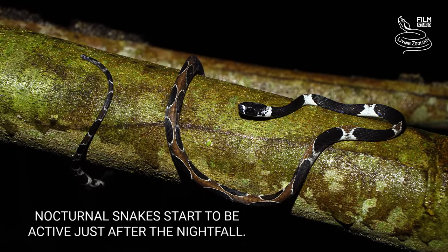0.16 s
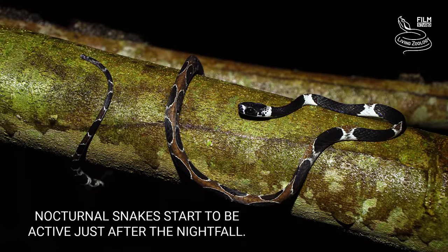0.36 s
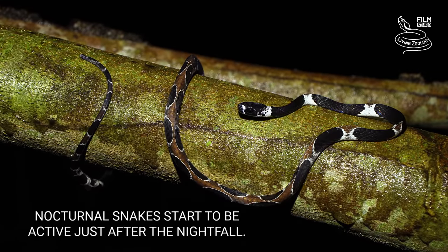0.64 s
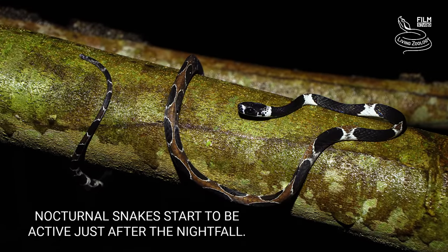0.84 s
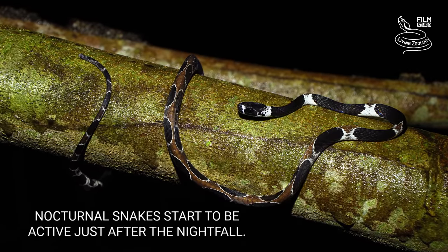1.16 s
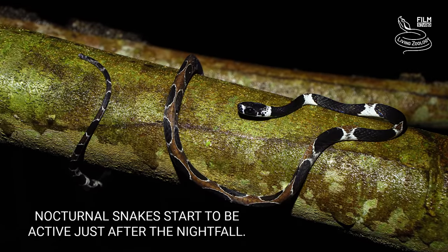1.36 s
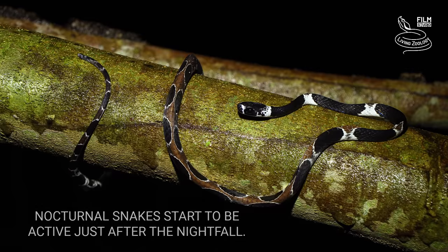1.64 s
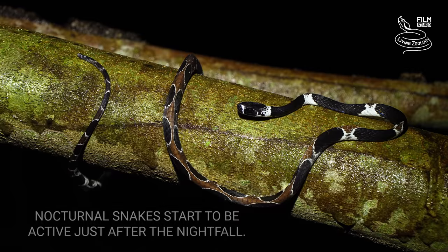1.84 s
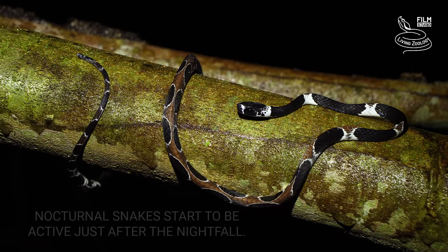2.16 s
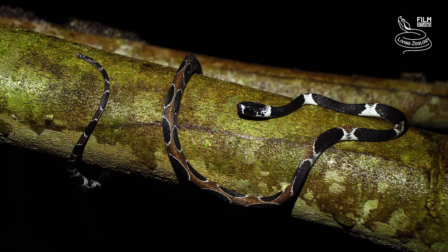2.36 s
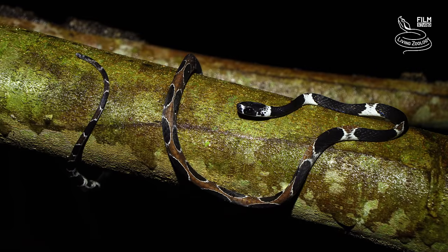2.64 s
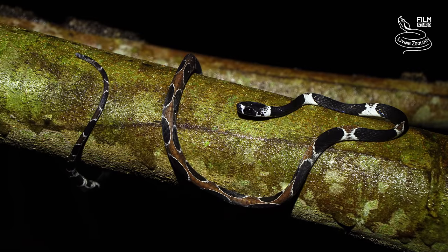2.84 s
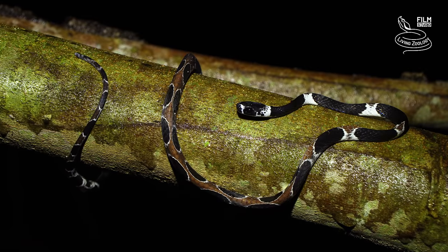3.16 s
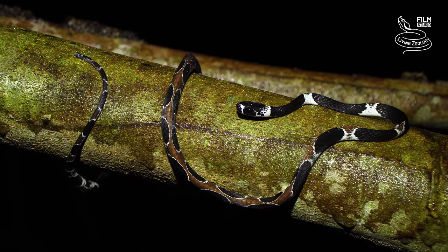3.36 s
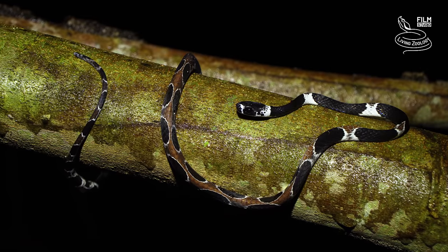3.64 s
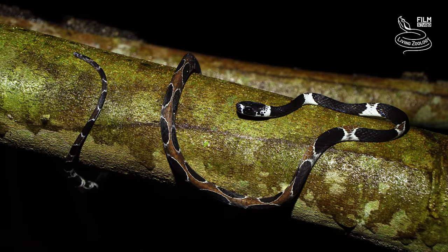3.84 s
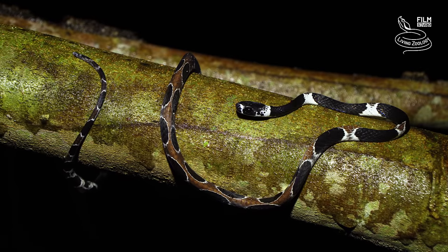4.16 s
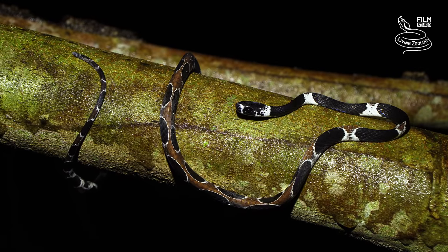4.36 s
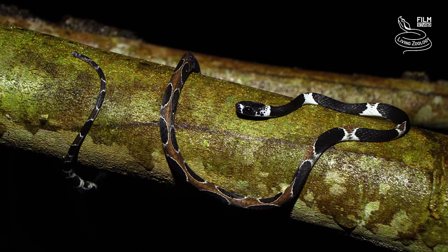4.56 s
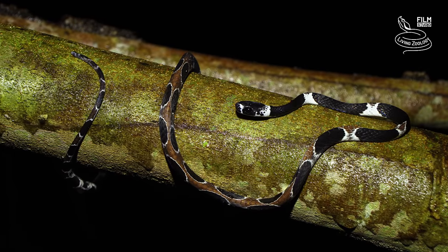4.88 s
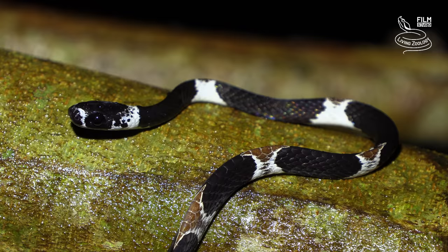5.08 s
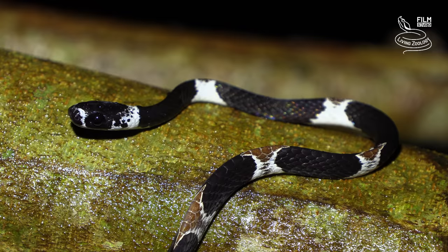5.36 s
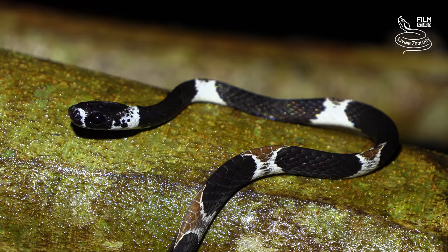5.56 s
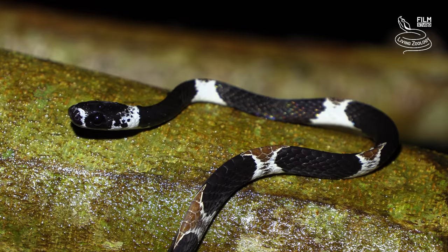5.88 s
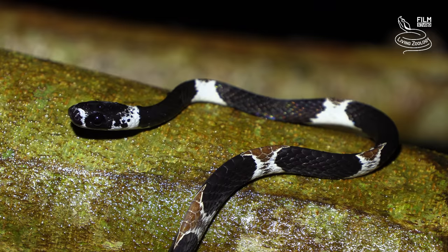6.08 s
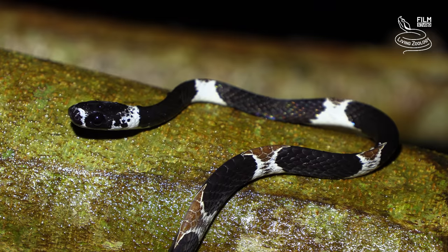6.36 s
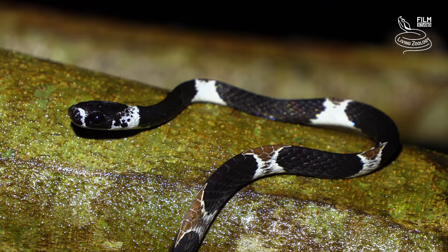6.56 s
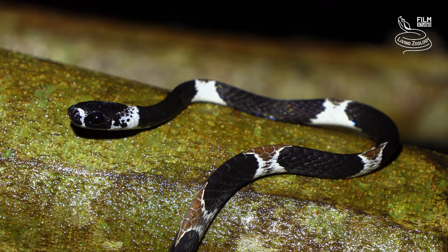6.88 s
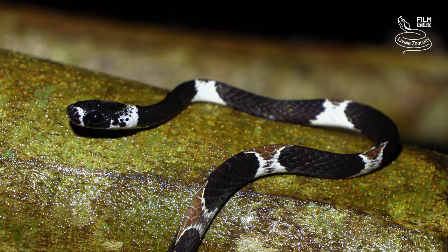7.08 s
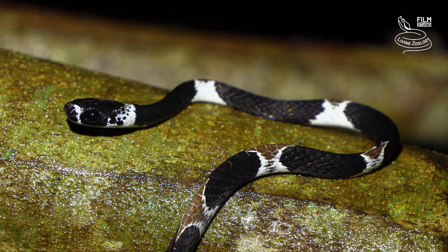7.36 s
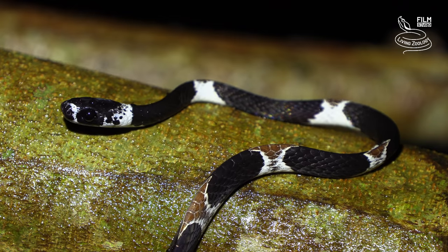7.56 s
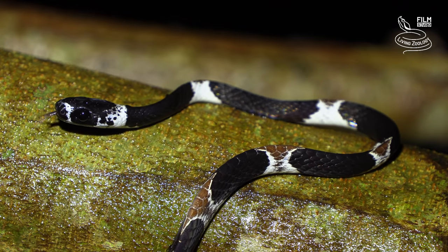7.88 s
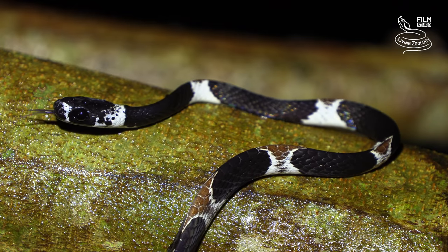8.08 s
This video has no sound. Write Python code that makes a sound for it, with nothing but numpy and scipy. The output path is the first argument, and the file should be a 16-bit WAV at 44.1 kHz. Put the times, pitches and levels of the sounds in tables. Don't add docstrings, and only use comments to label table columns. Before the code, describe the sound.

A rainforest at night, heard by a still microphone, with every call blurred by trunks and leaves. Throughout, distant insects form a dense, high, shimmering trill around 6 to 8.5 kHz, gently swelling, over very faint air and low hum. From 0 s a loud near cricket makes bright double chirps near 6.8 kHz, about ten per second; they turn weaker from about 1.2 to 2.7 s, then strong until 7.6 s. A lower cricket near 4.5 kHz sings short phrases until 5.3 s. A soft two-note rising frog call repeats every 0.65 s until 5.5 s; another frog rattles briefly about every 1.4 s. Faint far chirps run from 3.6 to 6.5 s. Small peeps come near 2.3, 3, 4.2, 4.4, 6.6 and 6.8 s. Sparse drips tap leaves, clearest near 1.6, 3.9, 4.8 and 6.1 s. From 6.8 s high katydid bursts repeat five times a second; from 7.6 s a low, raspy frog ticks rapidly to the end.

```python
import sys
import numpy as np
from scipy import signal
from scipy.io import wavfile
from scipy.ndimage import uniform_filter1d

SR = 44100
rng = np.random.default_rng(int(sys.argv[2]) if len(sys.argv) > 2 else 0)


def volts_from_db(level):
    exponent = np.asarray(level, float) / 20
    return 10 ** exponent


def inscribe(sig):
    pcm = np.round(np.clip(np.atleast_2d(sig).T, -1, 1) * 32767)
    wavfile.write(sys.argv[1], SR, pcm.astype(np.int16))


N = 362502
LEAD = 1
T = np.arange(N + LEAD * SR) / SR - LEAD

# pitch_hz, level_db (per Hz)
AIR = [(44, -35), (62, -7), (80, -1), (156, -7.5), (316, -9), (400, -11), (1140, -19), (1710, -19),
       (2470, -21.5), (3790, -18), (4400, -12.5), (5200, -24.5), (6500, -30)]
AIR_DB = -60.5
# pitch_hz, level_db (per Hz)
HAZE = [(4900, -28), (5200, -17.5), (5990, -6), (6300, 0), (6700, 1.5), (7000, -7.5), (7550, -7.5),
        (8000, -2), (8440, -4.5), (8650, -23), (8900, -14), (9400, -16), (10600, -35.5), (15600, -41.5)]
HAZE_DB = -43
# pitch_hz, level_db, wander_hz
HUM = [(51, -74, 0.11), (79.3, -69.5, 3), (89.2, -75, 3.12)]
# pitch_hz, level_db
BUZZ = [(5340, -74.5), (5416, -74), (5496, -73.5), (5580, -73.5), (5658, -74), (5733, -72)]
# middle_s, level_db, half_length_s
RUSTLE_SWELLS = [
    (.56, -66, .05),
    (1.04, -64, .1),
    (1.75, -70, .4),
    (4.55, -68, .12),
    (4.96, -60.5, 0.083),
    (6.2, -60, 0.11),
    (7.71, -63, .07),
]

# start_hz, end_hz, length_s, bend
GLIDE = dict(loud=(6720, 6890, .026, .35), low=(4700, 4290, .038, 3.3), far=(4185, 4090, .028, .8),
         burst=(7820, 7650, .018, 1.5), first=(2860, 3230, .045, .5), second=(2820, 3340, .06, .45),
         rattle=(3850, 4320, .02, .7), tick=(2420, 2345, .02, .8), whine=(4960, 4900, .055, 1))
REST_DB = dict(mid=-50.5, top=-51.5, edge=-60, drone=-80, rustle=-73.5, twin=-64.5)
# start_s, first_stroke_db, second_stroke_db, stroke_gap_s
BOUT_EARLY = [
    (-.455, -32, -35, 0.043),
    (-.035, -29.5, -29.5, 0.039),
    (.385, -30.5, -28, .04),
    (.807, -30, -29.5, 0.042),
]
BOUT_LONG = [(1.237, -39, -46, .042), (1.66, -44, -48, 0.049), (2.066, -39, -48, 0.043),
             (2.479, -38, -32, 0.038), (2.866, -30, -39, 0.039), (3.246, -31, -31, 0.044),
             (3.64, -30, -31, 0.048), (4.052, -31, -30.5, 0.04), (4.445, -29.5, -29.5, .045),
             (4.863, -30.5, -28.5, 0.043), (5.28, -31, -28, .039), (5.686, -30, -28, .036),
             (6.097, -28, -30, .039), (6.508, -29, -26.5, 0.039), (6.923, -30, -30.5, 0.037),
             (7.346, -32.5, -28.5, 0.037), (7.755, -27, -42, 0.045)]
EARLY_STOP_S, LONG_STOP_S = .83, 7.62
AFTER_S, AFTER_DB = .035, -7.5
AFTER_LOSS_DB_PER_S, TIGHT_GAP_S = 700, .037
UNEVEN_DB = .8
SAG_HZ_PER_DB, FULL_DB = 9, -29
# first_pair_s, level_db, last_pair_s, pair_count
LOW_PHRASES = [
    (-.165, -46, .024, 3),
    (.346, -46, .642, 4),
    (.997, -45.5, 1.177, 3),
    (1.53, -45, 1.697, 3),
    (2.112, -45, 2.395, 4),
    (2.714, -44.5, 2.876, 3),
    (3.349, -45.5, 3.633, 4),
    (4.286, -45, 4.474, 3),
    (5.113, -45, 5.211, 2),
]
LOW_GAP_S, LOW_FIRST_DB = .041, -0.5

# pitch_hz, fall_hz, strokes_per_s, level_db
CHOIR_LOW = [(6285, 200, 42, -7), (6425, 150, 58, -2.5), (6510, 200, 51, -5), (6615, 150, 29, 0),
             (6715, 200, 61, 0), (5990, 200, 37, -13)]
CHOIR_MID = [(7255, 150, 33, -2), (7375, 120, 19.5, 1), (7715, 120, 41, 0), (7800, 200, 47, 0),
             (7070, 100, 53, -6)]
CHOIR_TOP = [(8270, 150, 31, 0), (8390, 150, 15.5, 2), (8420, 200, 49, 0), (8460, 250, 63, -4)]
# time_s, level_db
LOW_CHOIR_LEVEL = [
    (0.0, -41.5),
    (0.82, -41.5),
    (1.1, -44.5),
    (2.3, -44.5),
    (2.72, -45.5),
    (5.7, -45.5),
    (7.0, -45.5),
    (7.49, -44.5),
    (7.8, -56),
]
# middle_s, level_db, half_length_s
MID_SWELLS = [
    (.8, -49, .3),
    (4.3, -52, 0.29),
    (5.7, -46.5, 0.45),
    (7.0, -49, 0.23),
    (7.42, -45, .05),
    (7.6, -46, .05),
    (7.81, -46.5, 0.045),
    (8.01, -47, 0.046),
]
TOP_SWELLS = [
    (.7, -50.5, 0.23),
    (2.0, -49, 0.22),
    (2.75, -49.5, 0.29),
    (5.4, -55, 1),
    (7.0, -47.5, .25),
    (7.6, -49, 0.071),
    (8.01, -52, .06),
    (8.18, -50, .05),
]
# middle_s, level_db, half_length_s
EDGE_SWELLS = [
    (.38, -50, .12),
    (1.35, -54, 0.27),
    (2.6, -60, 0.54),
    (3.3, -46.5, .1),
    (4.35, -48, .25),
    (5.2, -53, .3),
    (5.9, -48.5, 0.15),
    (7.15, -57, .3),
]
# middle_s, level_db, half_length_s
TWIN_SWELLS = [
    (2.6, -66, .6),
    (3.75, -66, 0.22),
    (4.56, -63, 0.11),
    (5.5, -63, .3),
]
TWIN_STOP_S, TWIN_FADE_DB_PER_S = 5.5, -21

# start_s, level_db
RATTLES = [
    (-.045, -50.5),
    (1.437, -50.5),
    (2.746, -50.5),
    (4.095, -50.5),
    (5.456, -49.5),
    (6.91, -50),
]
# middle_s, level_db, half_length_s
DRONE_SWELLS = [
    (.8, -74, 0.76),
    (1.85, -77, 0.23),
    (3.05, -74, .15),
    (3.43, -70.5, 0.064),
    (4.05, -72, .2),
    (4.9, -71.5, 0.25),
    (6.0, -76, .25),
    (6.75, -72.5, 0.26),
    (7.44, -72, .05),
    (7.8, -73, 0.18),
]
# start_s, level_db
TWO_NOTES = [(0.072, -55), (0.2153, -53), (0.728, -54.5), (0.8632, -52), (1.3208, -56.5), (1.4702, -54.5),
             (2.027, -55.5), (2.1587, -51.5), (2.6893, -55.5), (2.835, -51), (3.2912, -53), (3.4593, -51),
             (3.9637, -56), (4.1062, -53), (4.6524, -57), (4.791, -52), (5.292, -57.5), (5.4308, -52.5)]
# start_s, level_db, lowest_hz, highest_hz, patter_length_s
DRIPS = [(0.254, -57, 1200, 4000, .01), (0.525, -60, 1170, 2600, 0.012), (1.588, -53, 200, 980, .025),
         (1.645, -60, 2970, 4000, .006), (3.851, -52, 550, 2620, 0.023), (4.847, -48, 1190, 4530, 0.023),
         (5.015, -61, 1980, 3600, .01), (5.177, -61, 650, 1200, .02), (6.082, -49.5, 250, 4000, 0.021),
         (6.32, -52, 1300, 10000, 0.0028), (7.431, -57, 1380, 2020, 0.016)]
SNAP, SNAP_S = 20, .005
# start_s, level_db, end_pitch_hz
PEEPS = [
    (0.639, -60, 3980),
    (2.33, -52, 4350),
    (2.97, -51.5, 4380),
    (4.19, -48, 4500),
    (4.409, -48, 4520),
    (6.589, -49.5, 4450),
    (6.821, -48, 4510),
]
# start_s, level_db, pitch_hz
DRIP_RINGS = [(1.588, -53, 540), (3.85, -57, 660), (3.852, -57, 940), (3.853, -58, 1150),
              (3.851, -58, 1700), (5.095, -62, 1730), (5.205, -62, 1730), (5.18, -60, 740),
              (6.083, -57, 360), (6.085, -54, 2050), (6.083, -53, 3200), (6.092, -54, 3300),
              (8.16, -64, 1230)]
# first_s, level_db
FAR = (3.587, -57.5)
FAR_PERIOD_S = .1485
# start_s, level_db
BURSTS = [
    (6.755, -40),
    (6.94, -41),
    (7.135, -38),
    (7.35, -39),
    (7.535, -40),
    (7.75, -40),
    (7.945, -38.5),
    (8.14, -40),
]
OVERTONE_DB = -39
# first_s, level_db
TICKER = (7.639, -49.5)
TICK_PERIOD_S = .0948
# pitch_hz, level_db
RASP = [(1700, -27), (2400, -4.5), (2700, -16.5), (3800, -16), (4200, -6), (4780, -1), (4920, 3),
        (5060, -14), (9000, -37), (13500, -39), (15000, -39)]
WHINE_AFTER_S, WHINE_DB = 0.032, -9


def evened(x):
    return x / np.sqrt(np.mean(x ** 2) + 1e-20)


def curve(rows):
    return np.interp(T, *np.transpose(rows))


def add(mix, s, sound):
    part = mix[round((s + LEAD) * SR):][:len(sound)]
    part += sound[:len(part)]


def slow(rate):
    t = T[::512]
    sines = [np.sin(2 * np.pi * (f * t + rng.random())) for f in np.geomspace(rate / 20, rate, 12)]
    return np.interp(T, t, evened(sum(sines)))


def swells(rows, rest_db):
    humps = [volts_from_db(db) ** 2 * np.exp(-((T - s) / half) ** 2) for s, db, half in rows]
    return np.sqrt(volts_from_db(rest_db) ** 2 + sum(humps))


def forest(x, wet_db, t60):
    t = np.arange(SR) / SR
    tail = rng.standard_normal(SR) * volts_from_db(-60 * t / t60) * (1 - np.exp(-t / 0.004))
    wet = signal.fftconvolve(x, tail)[:len(x)]
    return x + volts_from_db(wet_db) * x.std() * evened(wet)


def voice(cycles, octave):
    return np.sin(2 * np.pi * cycles) + octave * np.sin(4 * np.pi * cycles)


def strokes(rows, glide, spread=0.0032, early=0.46, lead=0., rough=0.11, octave=0., sag=0.):
    from_hz, to_hz, length, bend = glide
    out, u = np.zeros(len(T)), np.arange(0, 1, 1 / (length * SR))
    quirks = rng.standard_normal((len(rows), 2))
    for (s, db), (detune, phase) in zip(rows, quirks):
        hz = (from_hz + (to_hz - from_hz) * u ** bend) * (1 + spread * detune)
        hz = hz + sag * np.clip(db - FULL_DB, -12, 0)
        swell = np.sin(np.pi * u ** early)
        add(out, s - lead, volts_from_db(db) * swell * voice(np.cumsum(hz) / SR + phase, octave))
    flutter = evened(uniform_filter1d(rng.standard_normal(len(T)), size=150))
    return out * (1 + rough * flutter)


def groups(rows, gap, count):
    return [(s + gap * k, db) for s, db in rows for k in range(count)]


def wash(points, patchy_db):
    hz, (f, db) = np.fft.rfftfreq(2048, 1 / SR), np.transpose(points)
    a, b, patches = rng.standard_normal((len(T) // 512 + 5, 1025, 3)).T
    patches = uniform_filter1d(patches, size=20, axis=0)
    patches = evened(uniform_filter1d(patches, size=8, axis=1))
    colour_db = np.interp(np.log(hz + 1), np.log(f), db, -120, -120)
    z = (a + 1j * b) * volts_from_db(colour_db[:, None] + patchy_db * patches)
    return evened(signal.istft(z, nperseg=2048, noverlap=1536)[1][:len(T)])


def steady(hz, db, wander_hz):
    level = volts_from_db(db + 3.0 + 1.83 * wander_hz ** .5 * slow(3))
    return level * np.sin(2 * np.pi * np.cumsum(hz + wander_hz * slow(2.5)) / SR)


def choir(singers, wet_db=1.5, duty=.65):
    out = np.zeros(len(T))
    for hz, fall_hz, rate, db in singers:
        beats = np.cumsum(rate * (1 + .04 * slow(3))) / SR + rng.random()
        u = np.minimum(beats % 1 / duty, 1)
        pitch = hz * (1 + .003 * slow(4)) - fall_hz * u ** 2
        out += volts_from_db(db + 2.0 * slow(5)) * np.sin(np.pi * u) * np.sin(2 * np.pi * np.cumsum(pitch) / SR)
    return evened(forest(out, wet_db, t60=1.0))


def night_air():
    return volts_from_db(AIR_DB) * wash(AIR, 0.62) + volts_from_db(HAZE_DB) * wash(HAZE, 0.93) + sum(steady(*row) for row in HUM)


def buzzer():
    return sum(steady(hz, db, 2.31) for hz, db in BUZZ)


def rustling_katydid():
    scrape = wash([(10500, -5), (11800, 5.0), (13500, 2), (15000, -12)], 1.7)
    return swells(RUSTLE_SWELLS, REST_DB["rustle"]) * volts_from_db(-7) * scrape


def chirps(bout, stop_s):
    places = np.arange(4 * len(bout) - 3) / 4
    s, first_db, second_db, gap = (np.interp(places, range(len(bout)), c) for c in np.transpose(bout))
    after_db = second_db + AFTER_DB - AFTER_LOSS_DB_PER_S * (gap - TIGHT_GAP_S)
    starts = np.r_[s, s + gap, s + gap + AFTER_S]
    rows = np.transpose([starts, np.r_[first_db, second_db, after_db]])
    rows = rows + [0, UNEVEN_DB] * rng.standard_normal((len(rows), 1))
    return rows[rows[:, 0] < stop_s]


def near_cricket():
    rows = np.r_[chirps(BOUT_EARLY, EARLY_STOP_S), chirps(BOUT_LONG, LONG_STOP_S)]
    song = strokes(rows, GLIDE["loud"], sag=SAG_HZ_PER_DB, spread=0.0016, early=0.38, lead=.003)
    return forest(song, -3.0, 0.65) * volts_from_db(-4.5)


def phrases(rows):
    starts = [(s, db) for first, db, last, pairs in rows for s in np.linspace(first, last, round(pairs))]
    return [(s, db + LOW_FIRST_DB) for s, db in starts] + [(s + LOW_GAP_S, db) for s, db in starts]


def low_cricket():
    song = strokes(phrases(LOW_PHRASES), GLIDE["low"], early=1.1, lead=.01, spread=.002, rough=.3)
    return forest(song, -3, 0.8) * volts_from_db(-2)


def distant_choirs():
    low = volts_from_db(curve(LOW_CHOIR_LEVEL)) * choir(CHOIR_LOW)
    middle = swells(MID_SWELLS, REST_DB["mid"]) * choir(CHOIR_MID)
    top = swells(TOP_SWELLS, REST_DB["top"]) * choir(CHOIR_TOP)
    return low + middle + top


def edge_singer():
    return swells(EDGE_SWELLS, REST_DB["edge"]) * volts_from_db(-5) * choir([(8570, 200, 55, 0)])


def twin_cricket():
    fade = volts_from_db(TWIN_FADE_DB_PER_S * np.maximum(T - TWIN_STOP_S, 0))
    return swells(TWIN_SWELLS, REST_DB["twin"]) * fade * choir([(4650, 150, 24, 0)])


def rattling_frog():
    slow_part = groups(RATTLES, .0245, count=3)
    quick_part = [(s + 0.068, db - 1.0) for s, db in groups(RATTLES, 0.017, count=7)]
    return forest(strokes(slow_part + quick_part, GLIDE["rattle"], early=1.0, rough=0.43), -1.2, 0.35)


def droning_frog():
    return swells(DRONE_SWELLS, REST_DB["drone"]) * volts_from_db(-2) * choir([(1560, 110, 21, 0), (1500, 90, 17, 0)], 2, .5)


def two_note_frog():
    first = strokes(TWO_NOTES[::2], GLIDE["first"], early=0.71, lead=0.0062, rough=0.43)
    second = strokes(TWO_NOTES[1::2], GLIDE["second"], early=0.75, rough=0.43)
    return volts_from_db(0.5) * forest(first + second, 4.4, 0.76)


def drips():
    t, out = np.arange(2000) / SR, np.zeros(len(T))
    noises = rng.standard_normal((len(DRIPS), 2000))
    for (s, db, low_hz, top_hz, length), noise in zip(DRIPS, noises):
        knocks = sum(volts_from_db(-60 * (t - length * k) / 0.022 - 3.8 * k) * (t >= length * k) for k in (0, .4, .8))
        leaf = signal.butter(2, [low_hz, min(top_hz, 16000)], "band", fs=SR, output="sos")
        click = SNAP * SNAP_S / length * (t == 0)
        add(out, s, volts_from_db(db) * knocks * evened(signal.sosfilt(leaf, noise + click)))
    return forest(out, -11, 0.42)


def peeping_frog():
    out, u = np.zeros(len(T)), np.arange(0, 1, 1 / (0.0363 * SR))
    for s, db, end_hz in PEEPS:
        hz = end_hz + 60 - 300 * (1 - u) ** 2
        add(out, s, volts_from_db(db) * np.sin(np.pi * u ** .6) * np.sin(2 * np.pi * np.cumsum(hz) / SR))
    return forest(out, 2.8, 0.46)


def rings():
    t, out = np.arange(4000) / SR, np.zeros(len(T))
    for s, db, hz in DRIP_RINGS:
        add(out, s, volts_from_db(db - 60 * t / .085) * np.sin(2 * np.pi * hz * t) * (1 - np.exp(-t / .0015)))
    return out


def far_cricket():
    rows = groups(groups([FAR], FAR_PERIOD_S, count=20), .027, count=3)
    return forest(strokes(rows, GLIDE["far"], spread=.002), -5, .5)


def burst_katydid():
    rows = groups(BURSTS, 0.016, count=5)
    return forest(strokes(rows, GLIDE["burst"], spread=0.0025, octave=volts_from_db(OVERTONE_DB)), -7, 0.36)


def ticking_frog():
    start, db = TICKER
    note = strokes(groups([TICKER], TICK_PERIOD_S, count=7), GLIDE["tick"], early=0.24, rough=.1, spread=.001)
    since = (T - start) % TICK_PERIOD_S
    rasp = (T > start) * (volts_from_db(-60 * since / 0.11) + .5) * wash(RASP, 0.69)
    whine = groups([(start + WHINE_AFTER_S, db + WHINE_DB)], TICK_PERIOD_S, count=7)
    whine = strokes(whine, GLIDE["whine"], rough=.5)
    return volts_from_db(-2.5) * forest(note, -3.5, 1.1) + whine + forest(volts_from_db(db - 4.5) * rasp, -8.0, 0.29)


def scene():
    background = night_air() + buzzer() + rustling_katydid()
    insects = near_cricket() + low_cricket() + distant_choirs() + edge_singer() + twin_cricket()
    insects = insects + far_cricket() + burst_katydid()
    frogs = rattling_frog() + droning_frog() + two_note_frog() + peeping_frog() + ticking_frog()
    return (background + insects + frogs + drips() + rings())[None, LEAD * SR:]


def top_cut(x):
    return signal.sosfilt(signal.butter(12, 15650, fs=SR, output="sos"), x)


def record(dry):
    return top_cut(dry)


dry = scene()
out = record(dry)
inscribe(out)
```